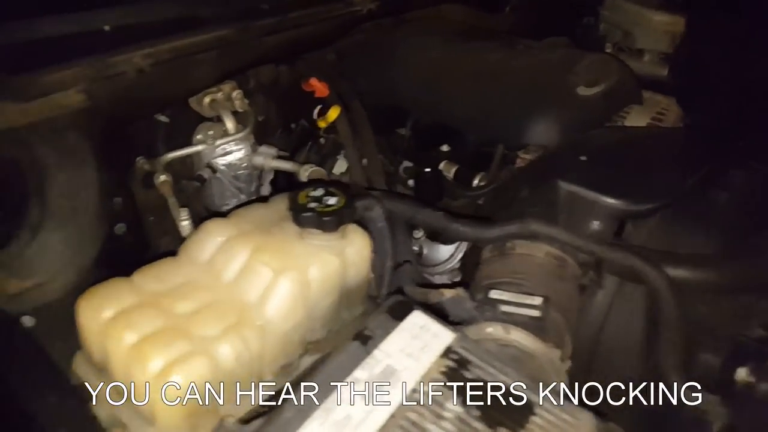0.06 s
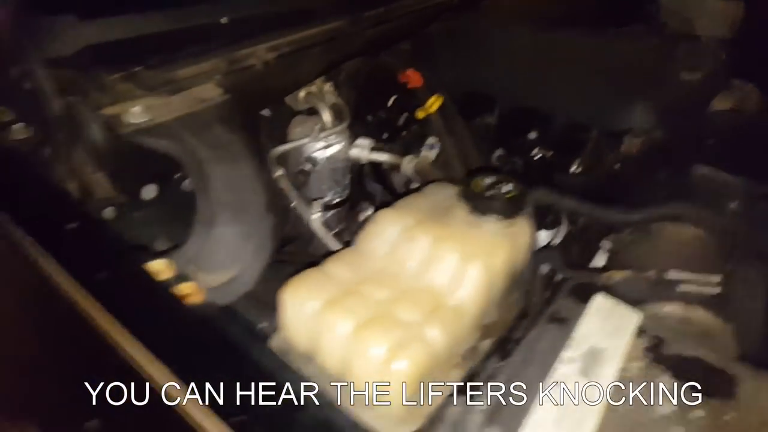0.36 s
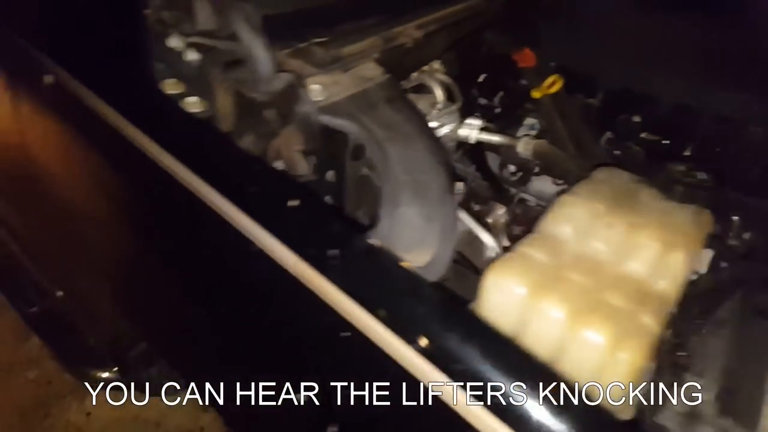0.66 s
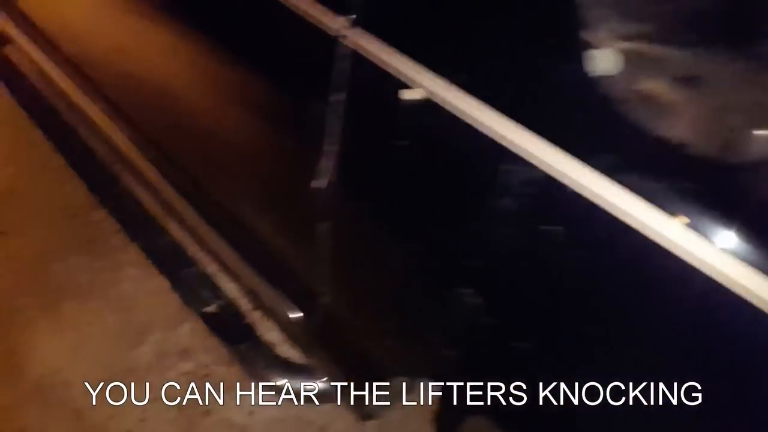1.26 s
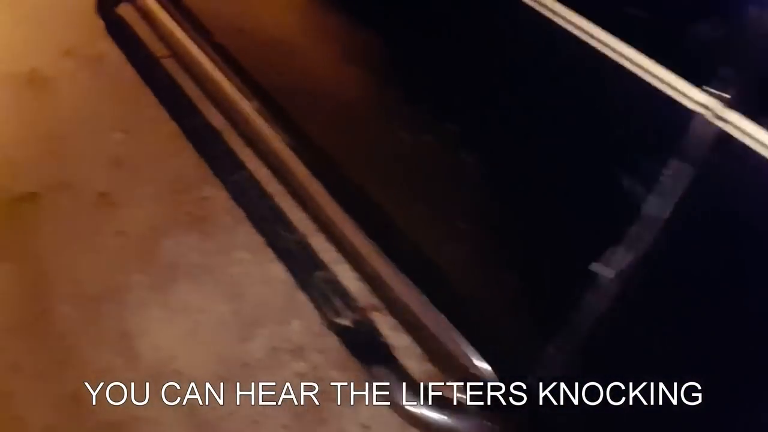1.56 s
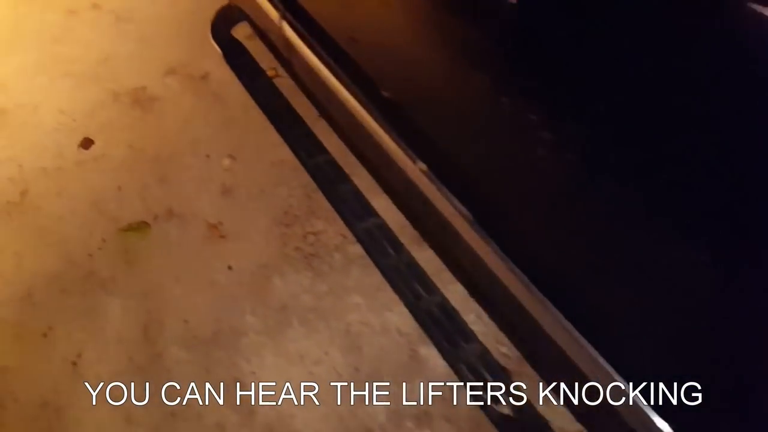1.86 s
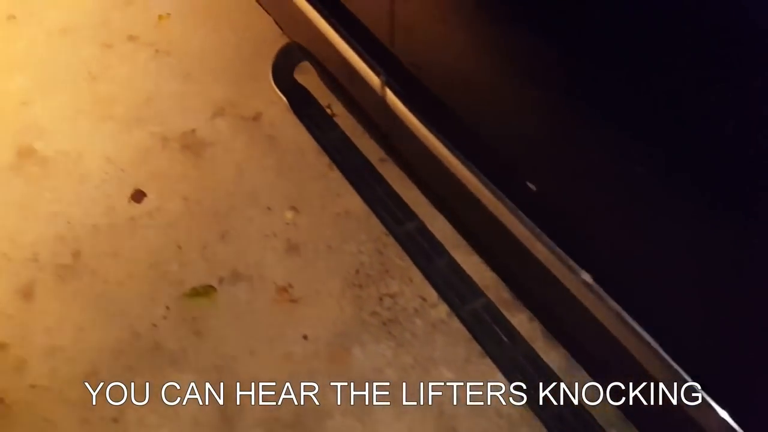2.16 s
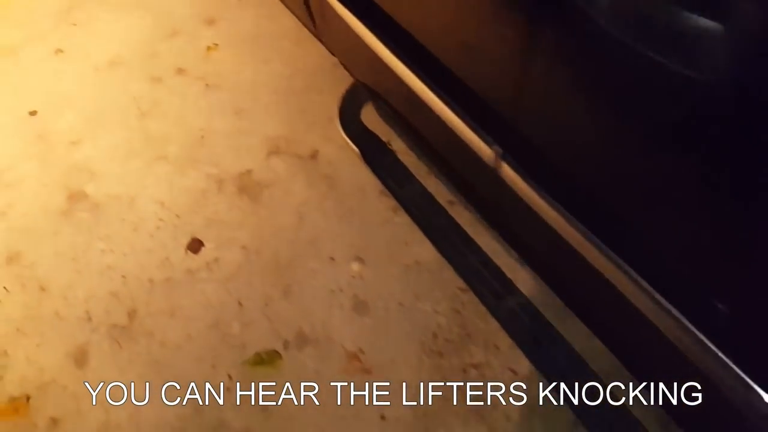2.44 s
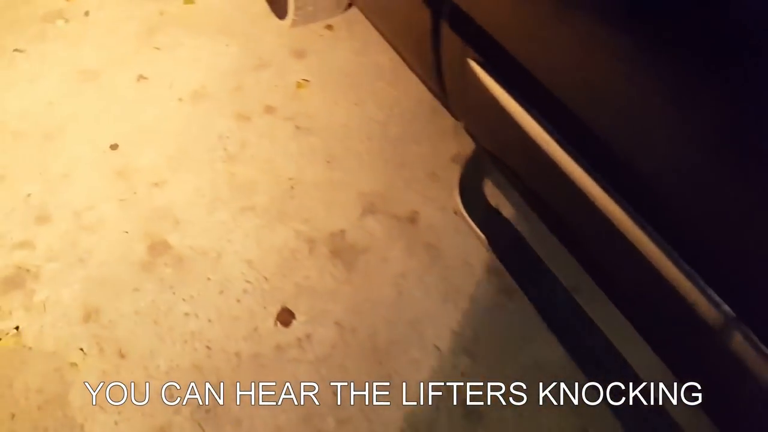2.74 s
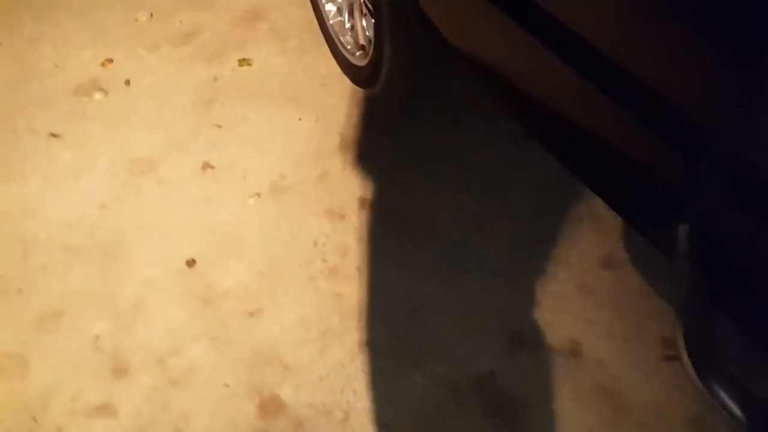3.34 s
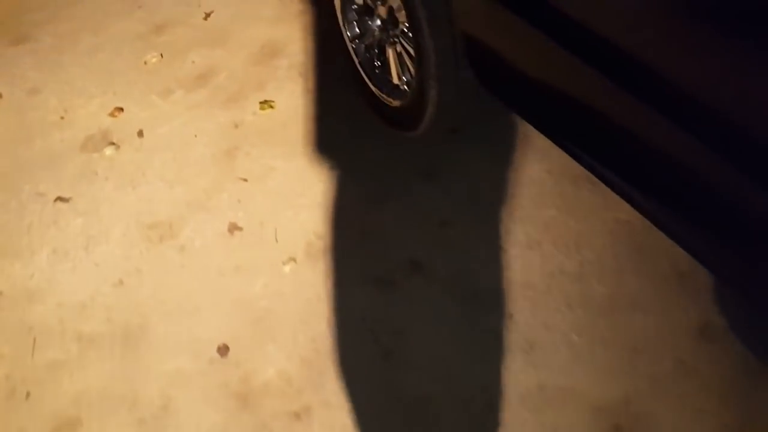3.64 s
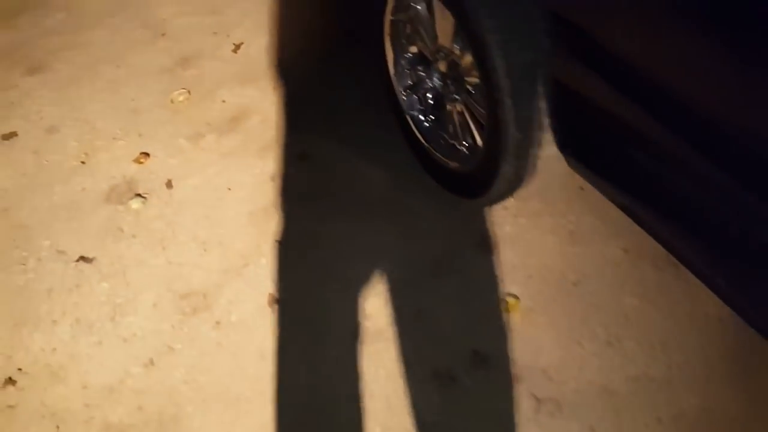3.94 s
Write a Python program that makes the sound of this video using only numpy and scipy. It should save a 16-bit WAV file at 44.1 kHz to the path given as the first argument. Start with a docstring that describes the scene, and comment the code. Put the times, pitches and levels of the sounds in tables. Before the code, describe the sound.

An idling truck engine ticks sharply about five times a second over clatter and rushing air. As the microphone walks from the engine toward the rear outdoors, the ticking fades and blurs while the deep, uneven exhaust rumble continues.

```python
"""Beside a V8 truck idling at night, a worn valve lifter ticks once in every engine cycle.
We start over the open engine bay, where the other valves clatter and the fan pushes a wash of air.
Then we move along the side towards the tail, and the ticks grow faint and blurred. The exhaust keeps
loping: eight uneven puffs a cycle make the pipe ring. A faint ring and a scuff pass late in the walk."""
import sys
import numpy as np
from scipy import signal
from scipy.fft import rfft, irfft
from scipy.io import wavfile

SR = 44100
rng = np.random.default_rng(int(sys.argv[2]) if len(sys.argv) > 2 else 0)


def wrap_up_sound(samples):
    """Save the sound to the file named by the first command line argument, as 16-bit audio."""
    columns = np.atleast_2d(samples).T
    # keep every value between -1 and 1, then stretch to whole-number steps
    tamed = np.clip(columns, -1, 1)
    steps = np.round(tamed * 32767).astype(np.int16)
    wavfile.write(sys.argv[1], SR, steps)


N = 176400
T, HZ = np.arange(N) / SR, np.fft.rfftfreq(N, 1 / SR)

# How alike the two ears hear a noise; 1 or more means identical: (frequency [Hz], likeness [ratio])
EAR_LIKENESS = [(50, 1.1), (200, 2.5), (350, 0.53), (550, 0.89), (900, 0.21), (2000, -0.21), (16000, 0)]
# Left ear against right, over the bay and beside the cab: (frequency [Hz], left minus right [dB])
BALANCE_BAY = [(60, -3), (200, -1), (380, -1.5), (700, -.5), (1290, -3), (2380, -5.5), (4400, 0.5),
               (8120, 3), (15000, 4)]
BALANCE_CAB = [(60, -0.3), (200, -0.8), (380, -3), (700, 0), (1290, -7.5), (2380, -7.5), (4400, -0.5),
               (8120, -0.5), (15000, 0)]
# Tone of the fan, belt and intake air, in the same two spots: (frequency [Hz], relative level [dB])
WASH_TONE_BAY = [(180, 4), (300, -20.5), (354, 1), (405, -12.5), (565, -4), (634, -9.5), (801, -4),
                 (994, -9), (1150, -8.5), (1250, -9), (1970, -5), (4370, -19), (11300, -23), (15000, -27),
                 (16000, -42)]
WASH_TONE_CAB = [(180, -29), (300, -4), (360, -6), (420, -12), (550, -9), (700, -8.5), (850, -10),
                 (1030, -14), (1350, -11), (1900, -12), (2500, -16), (3900, -17), (5300, -33), (8000, -38),
                 (11000, -41), (13300, -48), (16000, -62)]
# Loudness of that air along the walk: (time [s], level [dB])
WASH_LEVEL = [(0, -24.5), (.5, -28.5), (1.2, -32), (1.8, -36), (2.4, -39), (3.2, -38), (4, -40)]
# Tone of the faint scuff: (frequency [Hz], relative level [dB])
SCUFF_TONE = [(1000, -17), (4200, 8), (5200, -8), (6500, 2), (8000, -9), (10200, -4), (12000, -19),
              (16000, -22)]
# Pitches at which the bay and its sheet metal ring: (frequency [Hz], width [Hz], boost [dB])
BAY_RESONANCES = [(550, 50, 4), (1147, 30, 5), (1376, 25, 4.5), (1759, 40, 3), (2003, 70, 4.5),
                  (2278, 40, 4), (2868, 54, 2.5), (3381, 65, 3), (4642, 60, 3)]
# Valve knocks in each cycle: (delay after the worn lifter [s], relative level [dB])
VALVE_KNOCKS = [(0.014, 2), (.066, 1), (.092, -1), (.113, -21), (.143, 3.5), (0.158, -4)]
# Ring of the valve covers: (frequency [Hz], relative level [dB])
COVER_TONE = [(300, -17), (700, -10), (1100, -12), (1700, -6), (2050, 1), (2450, 1), (3000, -6), (3600, -8),
              (5000, -21), (9000, -27), (13000, -34), (16000, -48)]
# Loudness of the valve clatter along the walk: (time [s], level [dB])
CLATTER_LEVEL = [(0, -30), (.5, -32.5), (1.2, -36.5), (1.8, -42), (2.4, -44), (3.2, -47.5), (4, -47)]
# Swirling air under the truck: (frequency [Hz], relative level [dB])
RUMBLE_TONE = [(12, -42), (25, -22), (34, -8), (48, 1), (64, -10), (95, 1), (130, -2), (160, -12), (198, 1),
               (245, -9), (280, -3), (400, -16), (800, -40)]
# Each cylinder's puff, in firing order: (lag [s], strength over the bay [dB], strength by the cab [dB])
CYLINDER_PUFFS = [(0.01057, -5, -2.5), (0.01052, -2, -0.5), (0.01284, -1.5, -4.5), (0.0124, -3, -3.5),
                  (0.01125, -12, -5.5), (0.01178, -7, -10.5), (0.01, -1, -4), (0.01131, -4, -3)]
# How much earlier the puffs arrive as the tailpipe gets nearer: (time [s], head start [s])
PUFF_HEAD_START = [(0, 0.0037), (1.4, 0.0024), (2.05, .0073), (2.65, .0105), (3.7, 0.021)]
# Ring of the exhaust pipe and underbody: (frequency [Hz], relative level [dB])
PIPE_TONE = [(10, -88), (27, -68), (38, -54), (52, -44), (62, -51), (77, -36.5), (88, -42), (102, -24),
             (112, -50.5), (120, -25.5), (128, -25.5), (142, -42), (170, -55), (192, -34.5), (220, -44.5),
             (240, -51.5), (273, -42.5), (300, -52.5), (325, -50), (400, -62), (700, -79.5), (2000, -110)]
# Loudness of the pipe along the walk: (time [s], level [dB])
PIPE_LEVEL = [(0, -20), (.6, -21.5), (1.1, -24), (1.7, -23), (2.5, -22), (3.2, -21), (4, -20)]
# How the side of the truck changes the exhaust note: (frequency [Hz], boost [dB])
EXHAUST_SIDE_BOOST = [(30, 4), (50, 3), (77, -10), (92, 3), (102, -0.5), (115, 4), (128, 2), (160, -5),
                      (195, -2), (220, 2), (270, 2), (350, -6)]
# Lighter, thinner ticks and a small stray click: (time [s], level [dB])
LIGHT_TICK_HITS = [(1.714, -34.5), (2.1315, -40), (2.346, -43), (2.7526, -38), (2.899, -43), (3.106, -36),
                   (3.378, -39), (3.446, -47)]
# Tone of those light ticks: (frequency [Hz], relative level [dB])
LIGHT_TICK_TONE = [(800, -20), (2500, 13), (6000, -10), (10000, -1), (14000, -6), (16000, -5)]
# Ticks of the worn lifter, which also mark the engine cycles: (time [s], relative level [dB])
LIFTER_TICKS = [(.078, 3), (.283, 2.5), (.488, 2), (0.694, -2), (.900, -4.5), (1.107, -6.5), (1.312, -8),
                (1.518, -10.5), (1.724, -18.5), (1.933, -17.5), (2.14, -19.5), (2.349, -19), (2.556, -18),
                (2.764, -19.5), (2.973, -20.5), (3.179, -17.5), (3.387, -22.5), (3.596, -19), (3.806, -20)]
# Ring of the lifter over the bay and beside the cab: (frequency [Hz], relative level [dB])
LIFTER_TONE_BAY = [(400, -24), (1200, -3.5), (1700, 1.5), (2050, 14.5), (2600, 1), (3300, 6.5),
                   (4200, -3.5), (5000, -0.5), (6000, -0.5), (7500, -15.5), (10000, -9.5), (13000, -13.5),
                   (16000, -26)]
LIFTER_TONE_CAB = [(400, -15), (1200, -6), (2000, 0), (2600, -3), (3500, 2), (4400, -5), (5500, -9),
                   (7500, -10), (10000, -12), (13000, -12), (16000, -21)]

LEAVE_BAY_S, REACH_CAB_S = 0.45, 2.34


def amp(db):
    """Turns decibels into a number to multiply a sound by."""
    return 10 ** (np.asarray(db) / 20)


def unit(x):
    """Scales a signal to an average size (rms) of 1."""
    return x / np.sqrt(np.mean(x ** 2) + 1e-20)


def curve(points, t=T):
    """Joins the points of a time table with straight lines."""
    return np.interp(t, *np.transpose(points))


def spectrum(points):
    """Joins the points of a frequency table, giving each octave equal room."""
    hz, value = np.transpose(points)
    return np.interp(np.log(HZ + 1), np.log(np.maximum(hz, 1)), value)


def filtered(x, gain):
    """Applies a gain to each frequency; added silence keeps the end from spilling into the start."""
    padded_gain = np.interp(np.fft.rfftfreq(2 * N, 1 / SR), HZ, gain)
    return irfft(rfft(x, 2 * N) * padded_gain, 2 * N)[..., :N]


def noise(tone):
    """Stereo noise with the given tone, alike in both ears only at low pitches."""
    left, other = rfft(rng.standard_normal((2, N)))
    likeness = np.clip(spectrum(EAR_LIKENESS), -1, 1)
    right = likeness * left + np.sqrt(1 - likeness ** 2) * other
    return unit(irfft(np.array([left, right]) * amp(spectrum(tone)), N))


def drift(rate_hz):
    """A smooth random wobble with an average size of 1."""
    return unit(irfft(rfft(rng.standard_normal(N)) * np.exp(-(HZ / rate_hz) ** 2), N))


def swell(start_s, length_s):
    """A smooth rise and fall."""
    return np.sin(np.pi * np.clip((T - start_s) / length_s, 0, 1))


def impact(start_s, rise_s, decay_s):
    """The power of one tick or knock: it rises fast, then dies away."""
    age = np.maximum(T - start_s, 0)
    return (np.minimum(age / rise_s, 1) * np.exp(-np.minimum(age / decay_s, 20))) ** 2


def along_walk(bay, cab, t=T):
    """Slides from what we hear over the bay to what we hear beside the cab."""
    walked = np.clip((t - LEAVE_BAY_S) / (REACH_CAB_S - LEAVE_BAY_S), 0, 1)
    return bay * (1 - walked) + cab * walked


def walking_noise(bay_tone, cab_tone):
    """Noise that changes tone along the walk while its power stays even."""
    walked = along_walk(0, 1)
    return np.sqrt(1 - walked) * noise(bay_tone) + np.sqrt(walked) * noise(cab_tone)


def cycle_starts():
    """When engine cycles begin: at each lifter tick, plus one cycle before and two after."""
    ticks = np.array(LIFTER_TICKS)[:, 0]
    period = np.diff(ticks).mean()
    return np.r_[ticks[0] - period, ticks, ticks[-1] + period, ticks[-1] + 2 * period]


def fan_wash(flutter_db=1.2):
    """Air rushing through the fan, belt and intake flutters, and fades and dulls as we walk."""
    air = walking_noise(WASH_TONE_BAY, WASH_TONE_CAB)
    return air * amp(curve(WASH_LEVEL) + flutter_db * drift(rate_hz=28))


def faint_ring(pitch_hz=845, level_db=-45.5):
    """A brief, quiet note that wavers a little."""
    phase = 2 * np.pi * pitch_hz * T + 0.44 * drift(rate_hz=12)
    return amp(level_db) * swell(start_s=2.72, length_s=.32) * np.sin(phase)


def faint_scuff(level_db=-55):
    """A short, soft swell of high hiss."""
    return amp(level_db) * swell(start_s=3.14, length_s=.33) * noise(SCUFF_TONE)


def bodywork(sound, spots=7, echoes=24, echo_db=-9.5, spread_s=.014, dull_hz=3240):
    """The bay rings at its own pitches, and the panels send back dull echoes that change as we move."""
    boost_db = sum(db / (1 + (2 * (HZ - hz) / width) ** 2) for hz, width, db in BAY_RESONANCES)
    heard = filtered(sound, amp(boost_db))
    dull = filtered(heard, amp(echo_db) / np.sqrt(1 + (HZ / dull_hz) ** 2))
    for spot_s in np.linspace(0, T[-1], spots):  # each spot has its own echo pattern
        pattern = np.zeros(int(spread_s * SR) + 1)
        strengths = rng.choice([-1, 1], echoes) / np.sqrt(echoes)
        pattern[(rng.random(echoes) * len(pattern)).astype(int)] = strengths
        nearness = np.sqrt(np.maximum(1 - abs(T - spot_s) * (spots - 1) / T[-1], 0))
        heard = heard + nearness * signal.oaconvolve(dull, pattern[None], axes=1)[:, :N]
    return heard


def valve_clatter(scatter_s=0.002, scatter_db=1.8):
    """The other valves knock dully through their covers, in the same order every cycle."""
    power = np.zeros(N)
    for start in cycle_starts()[:-2]:
        for delay, db in VALVE_KNOCKS:
            late, hard = rng.standard_normal(2)
            knock = impact(start + delay + scatter_s * late, rise_s=0.0027, decay_s=0.017)
            power += amp(db + scatter_db * hard) ** 2 * knock
    return amp(curve(CLATTER_LEVEL)) * unit(np.sqrt(power) * noise(COVER_TONE))


def pipe_ring():
    """How the exhaust pipe rings after a single puff."""
    log_gain = np.log(amp(spectrum(PIPE_TONE)))
    mirrored = np.r_[log_gain, log_gain[1:-1][::-1]]
    response = np.exp(np.conj(signal.hilbert(mirrored)))  # minimum phase: no ringing before the puff
    return np.fft.ifft(response).real[:SR // 2]


def exhaust(scatter_s=.00025, scatter_db=1.1, rumble_db=-30.5):
    """Eight uneven puffs a cycle make the pipe ring, over a rumble of swirling air."""
    starts = cycle_starts()
    lag, bay_db, cab_db = np.transpose(CYLINDER_PUFFS)
    times = starts[:-1, None] + np.diff(starts)[:, None] * np.arange(len(lag)) / len(lag) + lag
    times = times - curve(PUFF_HEAD_START, times) + scatter_s * rng.standard_normal(times.shape)
    strength_db = along_walk(bay_db, cab_db, times) + scatter_db * rng.standard_normal(times.shape)
    puffs = np.zeros(N + 2 * SR)  # a spare second at each end
    puffs[np.round(times * SR).astype(int) + SR] = amp(strength_db)
    pipe = unit(signal.fftconvolve(puffs, pipe_ring())[SR:SR + N])
    sound = pipe * amp(curve(PIPE_LEVEL)) + amp(rumble_db) * noise(RUMBLE_TONE)
    return along_walk(sound, filtered(sound, amp(spectrum(EXHAUST_SIDE_BOOST))))


def light_ticks():
    """Thin, quiet ticks and a small stray click that come and go."""
    power = sum(amp(db) ** 2 * impact(start, rise_s=.001, decay_s=0.0096) for start, db in LIGHT_TICK_HITS)
    return np.sqrt(power) * noise(LIGHT_TICK_TONE)


def worn_lifter(gain_db=-16.5, cab_boost_db=0.5, rise_s=.0025, tail_db=-15.5, second_db=-18):
    """A sharp metal tick; echoes blur it and its tone changes once the truck's side hides the engine."""
    power = np.zeros(N)
    for start, db in LIFTER_TICKS:
        decay_s = along_walk(bay=.007, cab=.015, t=start)
        tick = impact(start, rise_s, decay_s)
        tail = amp(tail_db) ** 2 * impact(start, rise_s, decay_s=0.02)
        second_lifter = amp(second_db) ** 2 * impact(start + 0.06, rise_s, decay_s)
        power += amp(db) ** 2 * (tick + tail + second_lifter)
    walked = along_walk(0, 1)
    bay_ring = np.sqrt(1 - walked) * noise(LIFTER_TONE_BAY)
    cab_ring = np.sqrt(walked) * amp(cab_boost_db) * noise(LIFTER_TONE_CAB)
    return amp(gain_db) * np.sqrt(power) * (bay_ring + cab_ring)


def scene(ear_gap_s=0.00012):
    """Engine and exhaust, heard first over the bay and then beside the cab."""
    engine = bodywork(worn_lifter() + light_ticks() + valve_clatter() + fan_wash())
    small_sounds = faint_ring() + faint_scuff()
    channels = []
    for front, pipe, side in zip(engine + small_sounds, exhaust(), (.5, -.5)):  # left ear, then right
        delay = np.exp(-2j * np.pi * HZ * side * ear_gap_s)  # the exhaust reaches the right ear first
        mix = front + filtered(pipe, delay)
        bay = filtered(mix, amp(side * spectrum(BALANCE_BAY)))
        cab = filtered(mix, amp(side * spectrum(BALANCE_CAB)))
        channels.append(along_walk(bay, cab))
    return np.array(channels)


def record(dry):
    """Cuts away the very highest treble."""
    cutoff_hz = 15850
    low_pass = signal.firwin(511, cutoff_hz, window=("kaiser", 9), fs=SR)
    return signal.oaconvolve(dry, low_pass[None], "same", axes=1)


dry = scene()
out = record(dry)
wrap_up_sound(out)
```